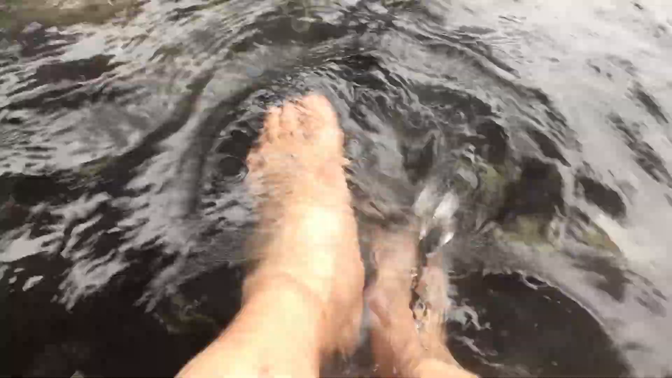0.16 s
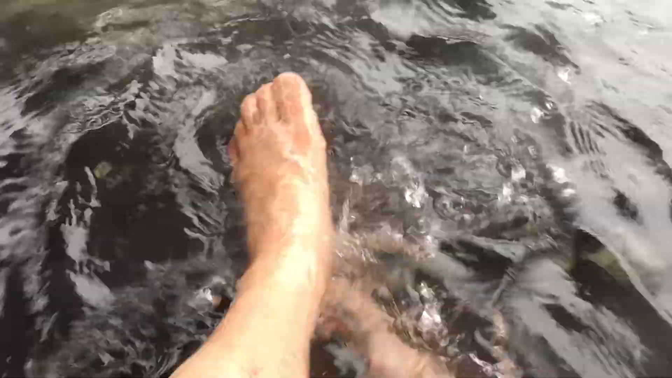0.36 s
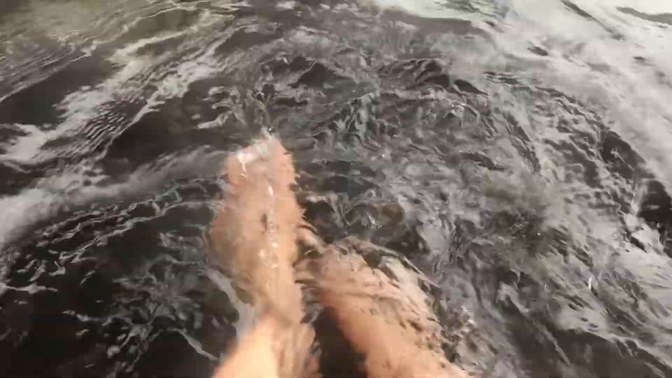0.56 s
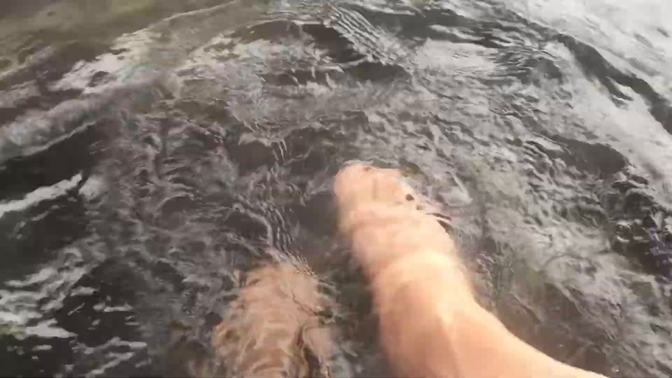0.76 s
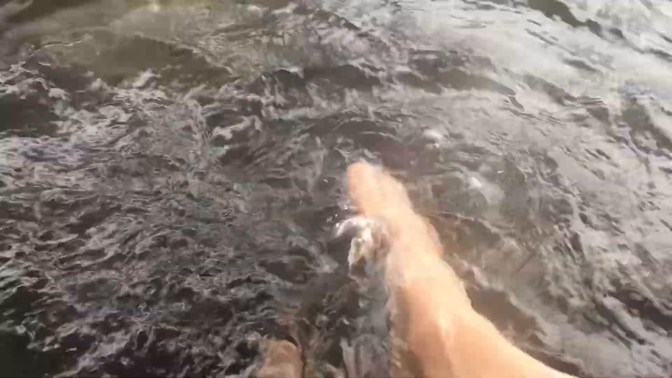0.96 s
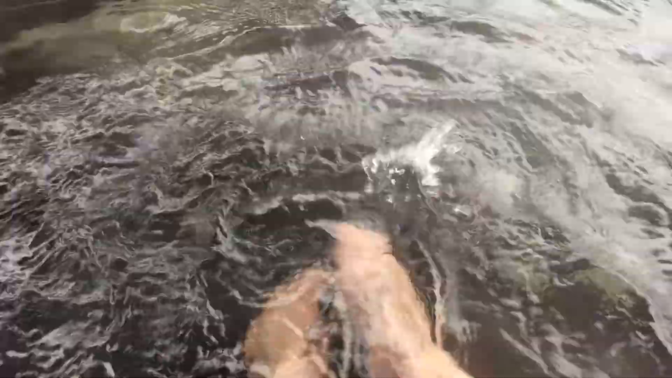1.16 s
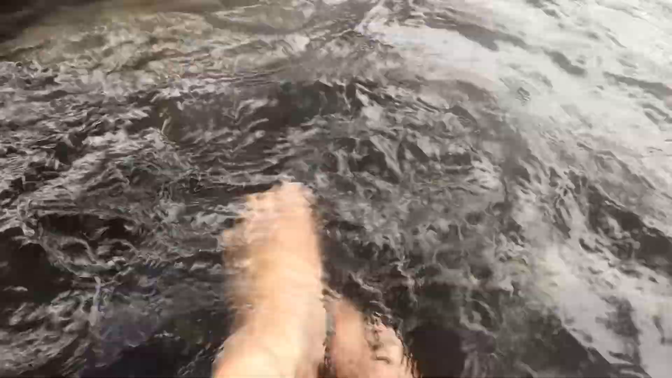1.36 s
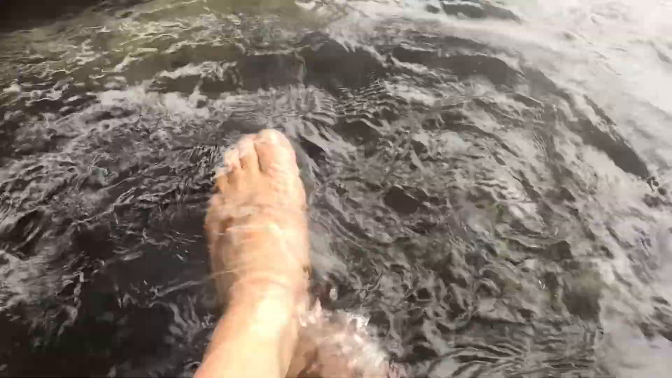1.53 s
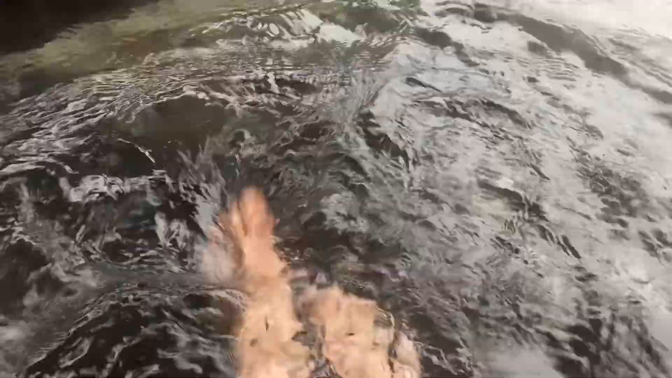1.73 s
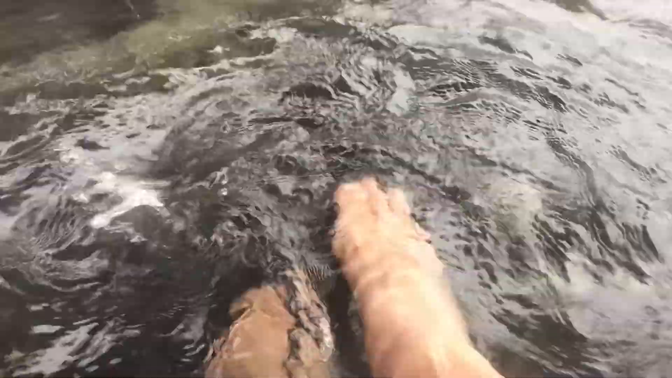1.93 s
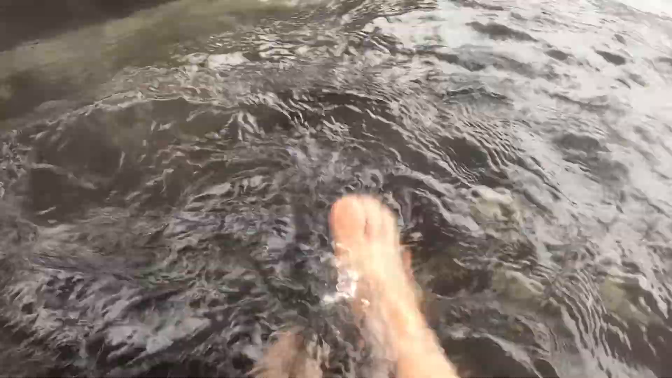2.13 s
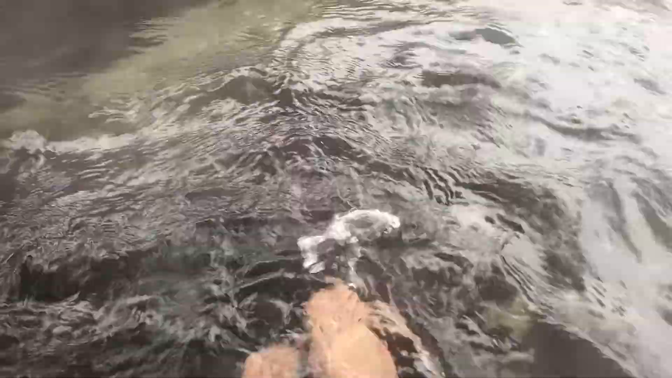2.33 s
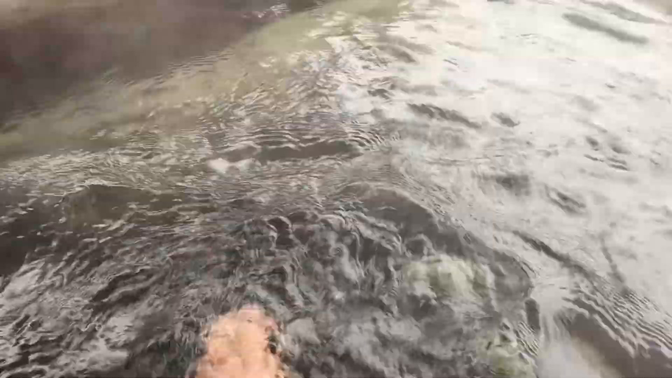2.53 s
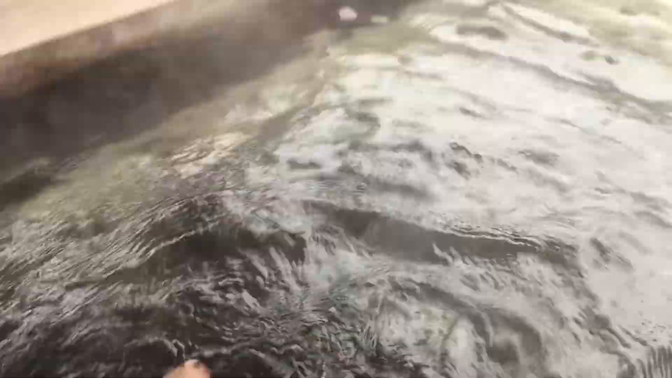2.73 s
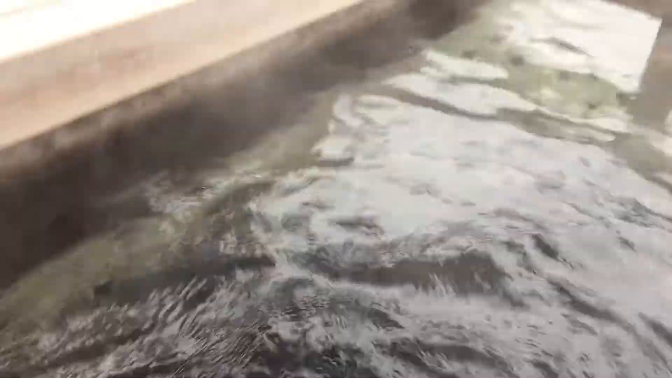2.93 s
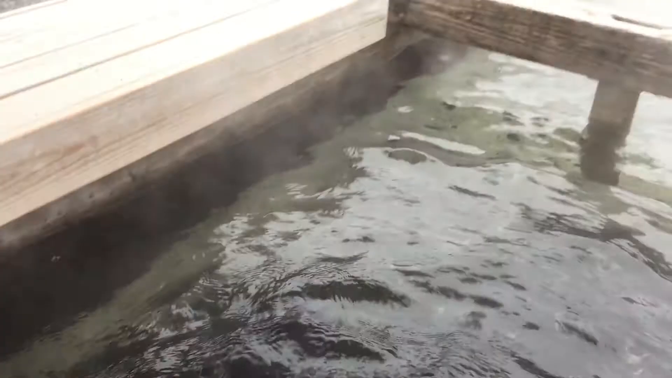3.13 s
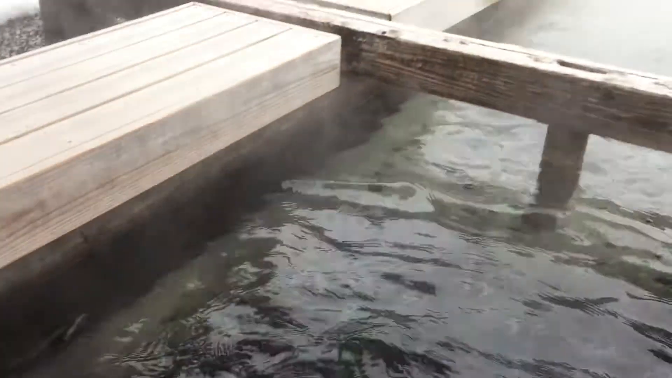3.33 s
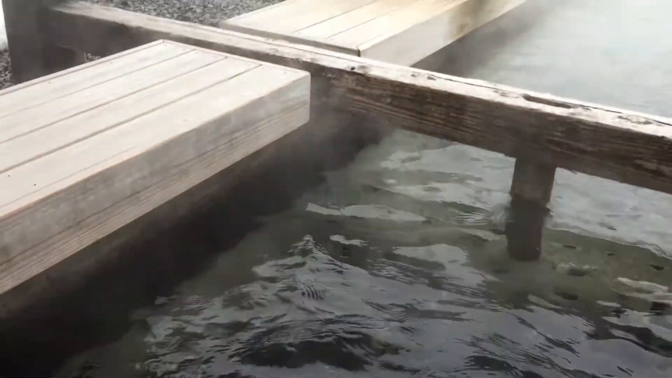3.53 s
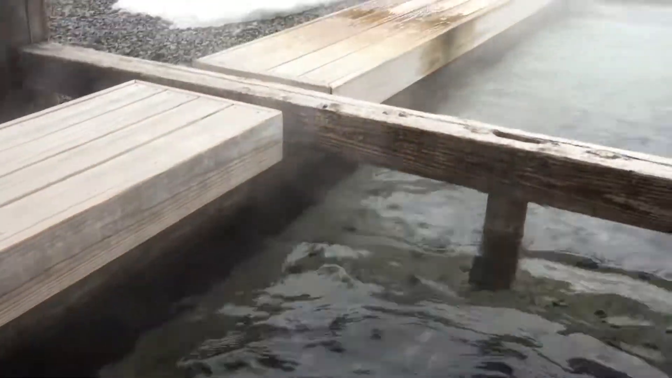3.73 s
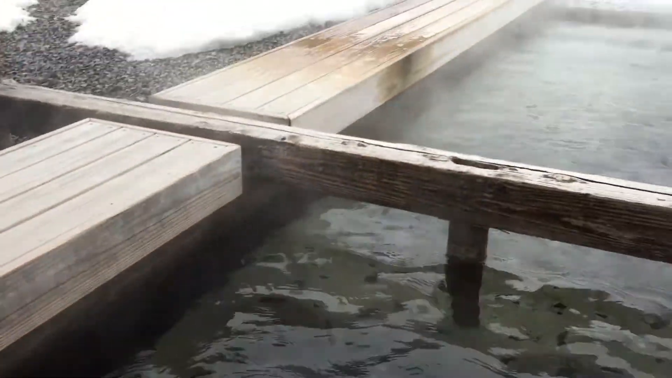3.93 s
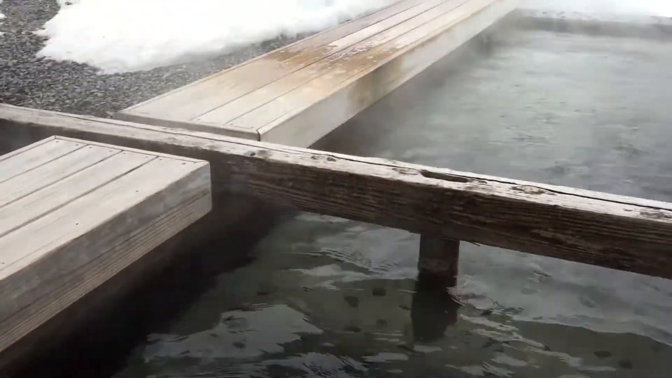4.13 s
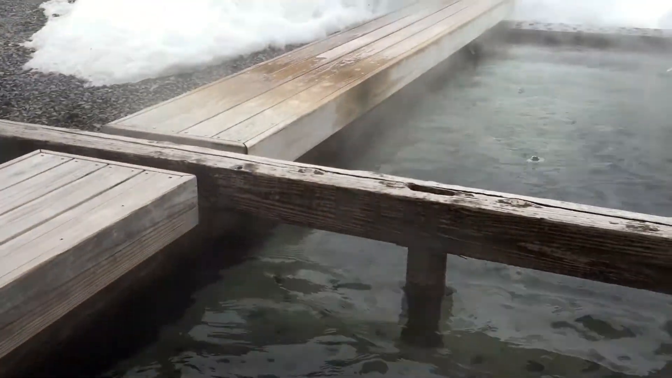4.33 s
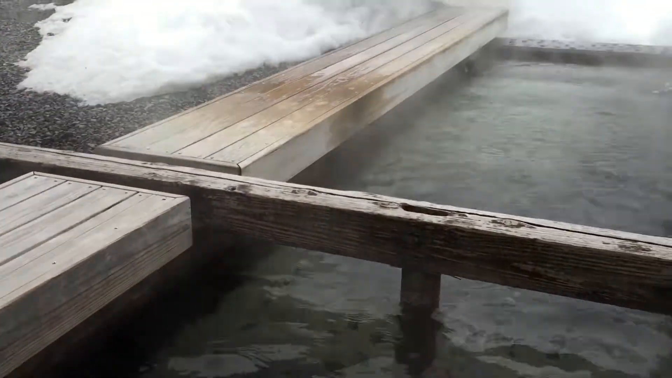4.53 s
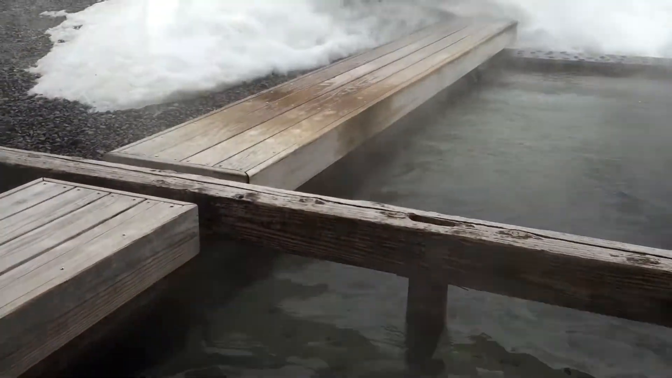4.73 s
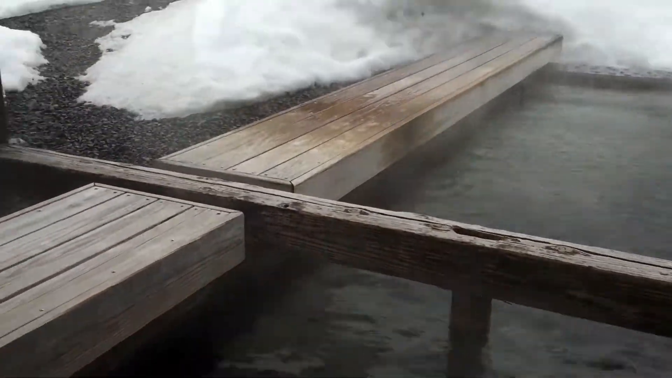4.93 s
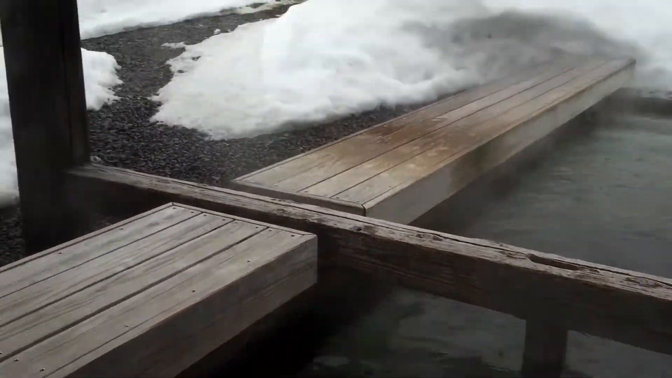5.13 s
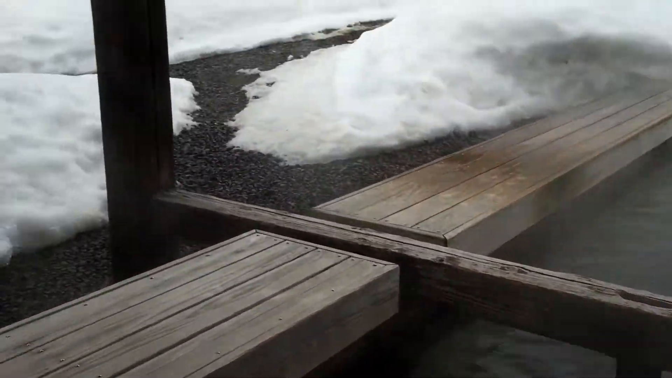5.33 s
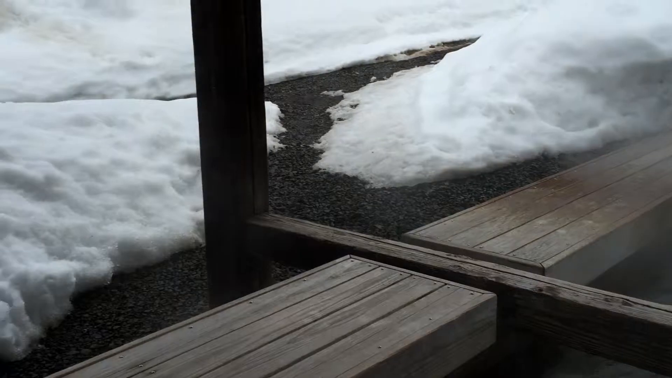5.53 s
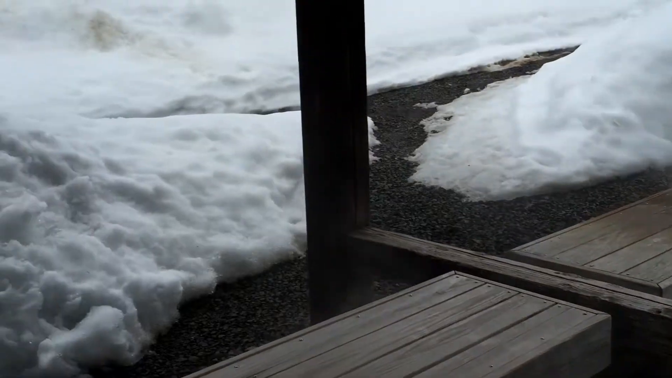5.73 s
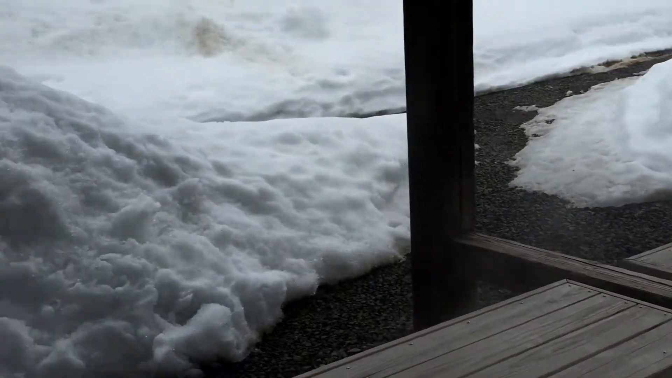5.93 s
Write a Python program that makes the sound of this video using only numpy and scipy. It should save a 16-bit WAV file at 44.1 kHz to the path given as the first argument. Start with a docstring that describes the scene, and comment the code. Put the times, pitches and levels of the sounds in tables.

```python
"""Feet in an outdoor hot footbath

Feet paddle close to the microphone, then rest while the water laps at the timber sides.
Kicks slap the surface as noise bursts, trap air that rings as gliding, decaying tones, and throw a
spray of very short, high grains. Echoes come from the roof and benches. Light wind, shaped noise,
brushes the microphone, and near the end a small clack excites resonances with rough contact noise."""
import sys
import numpy as np
from scipy import signal
from scipy.fft import rfft, irfft, next_fast_len
from scipy.io import wavfile
from scipy.ndimage import uniform_filter1d

SR = 44100
rng = np.random.default_rng(int(sys.argv[2]) if len(sys.argv) > 2 else 0)


def digitize_waveform(pressure):
    """Quantize a signal to 16-bit integers and store it at the path in sys.argv[1].

    Rows of a 2-D input are taken as channels; values are limited to [-1, 1].
    """
    field = np.atleast_2d(pressure).T
    bounded = np.clip(field, -1, 1)
    quanta = np.round(bounded * 32767).astype(np.int16)
    wavfile.write(sys.argv[1], SR, quanta)


N = 268108
TIME = np.arange(N) / SR


def amp(db):
    """Decibels to amplitude gain."""
    return 10 ** (np.asarray(db) / 20)


def unit(x):
    """Normalisation to an rms of one."""
    return x / np.sqrt(np.mean(x ** 2) + 1e-20)


def read(points, hz):
    """Interpolation of a (Hz, value) table on a log-frequency axis."""
    f, value = np.transpose(points)
    return np.interp(np.log(hz + 1), np.log(f + 1), value)


def follow(points):
    """Linear interpolation of a (seconds, value) table at every sample."""
    s, value = np.transpose(points)
    return np.interp(TIME, s, value)


def add(mix, s, sound):
    """Superposition: mixes a sound in at time s."""
    part = mix[max(round(s * SR), 0):][:len(sound)]
    part += sound[:len(part)]


def colour(x, points, tilt=0, size=1024):
    """Minimum-phase filtering: a spectrum and treble tilt (dB per octave) that keep attacks sharp."""
    hz = abs(np.fft.fftfreq(size, 1 / SR))
    octaves = np.log2(np.maximum(hz, 1500) / 5000)
    log_gain = np.log(amp(np.maximum(read(points, hz) + tilt * octaves, -80)))
    # the phase of a minimum-phase filter is the Hilbert transform of its log gain
    taps = np.fft.ifft(np.exp(np.conj(signal.hilbert(log_gain)))).real
    return signal.oaconvolve(x, taps)[:len(x)]


def noise(points):
    """Spectral shaping: steady random noise with the given spectrum, at an rms of one."""
    size = next_fast_len(N)
    gain = amp(read(points, np.fft.rfftfreq(size, 1 / SR)))
    return unit(irfft(rfft(rng.standard_normal(size)) * gain, size)[:N])


def die(age, t60):
    """Exponential decay: falls by 60 dB in t60 seconds."""
    return np.exp(-np.log(1000) * np.maximum(age, 0) / max(t60, .002))


def ring(hz, t60, rise=0, sag=0, onset=0.079):
    """Damped resonance: a decaying tone with steady pitch drift (rise) and an early fall (sag)."""
    t = np.arange(int(np.clip(t60, .002, 1) * SR * 1.2)) / SR
    age = t / t60
    glide = 1 + rise * (age - 1 / 10) + sag * (np.exp(-age * 2 * np.pi) - 1 / 2)
    turns = hz * np.cumsum(glide) / SR
    attack = 1 - np.exp(-turns / onset)  # onset in cycles
    return np.sin(2 * np.pi * turns) * np.exp(-np.log(1000) * age) * attack


def swarm(low_hz, high_hz, per_s, cycles, spread_db, glide, count=36):
    """Random pulse trains: bubbles of chance strength and time on many pitches, levelled overall."""
    out = np.zeros(N)
    for hz in np.geomspace(low_hz, high_hz, count):
        born = rng.random(N) < per_s / count / SR
        strength_db = spread_db * np.minimum(rng.exponential(1, born.sum()), 4)
        train = np.zeros(N)
        train[born] = amp(strength_db) * (-1) ** np.flatnonzero(born)  # random sign
        life, rise, sag = rng.random(3)
        bubble = ring(hz, cycles * (life + .5) / hz, rise=glide * (rise - .5), sag=glide * sag)
        out += signal.oaconvolve(train, bubble * np.sqrt(hz))[:N]
    out = unit(out)
    return out / np.sqrt(abs(uniform_filter1d(out ** 2, size=3000)) + 0.211)


# Strokes of the feet through the water. Each row: crest in seconds, churning level in dB,
# spray level in dB, 60 dB swell time in seconds, 60 dB settling time in seconds.
STROKES = [(0.0, -40.5, -44.5, .1, 0.16), (0.17, -52, -54, 0.037, 0.58), (0.238, -37.5, -42.5, 0.046, 0.25),
           (0.41, -42, -44, 0.53, 0.68), (0.6, -54.5, -47.5, 0.41, 0.3), (0.72, -59.5, -56, 0.45, 0.27),
           (0.83, -60.5, -51, 0.4, 0.38), (0.93, -47, -49.5, 0.14, 0.2), (1.03, -50.5, -54, 0.075, 0.21),
           (1.152, -50, -50.5, 0.32, .35), (1.57, -51, -56.5, .4, 0.34), (1.701, -42, -52, 0.32, .22),
           (1.861, -41, -44.5, 0.065, 0.2), (1.979, -53.5, -65, 0.45, 0.061),
           (2.098, -43.5, -51, 0.096, 0.63), (2.35, -45.5, -47, 0.14, 0.24),
           (2.465, -56.5, -63.5, 0.14, 0.07)]
# Ripples that go on between strokes and die down at rest. Each row: time in seconds, level in dB.
RIPPLE = [(0, -68), (1.35, -71.5), (2.2, -67), (2.6, -66.5), (3.2, -68), (3.9, -69), (4.7, -71), (5.3, -74)]
FIZZ_DB, FIZZ_T60_S = -17, 2.6  # foam left by a stroke keeps bursting, relative to its spray


def stirring():
    """Power addition of strokes and ripples: each stroke swells, settles and leaves fizzing foam."""
    ripple_db = follow(RIPPLE)
    churn_power = amp(ripple_db) ** 2
    spray_power = amp(ripple_db - 7.5) ** 2
    for s, churn_db, spray_db, swell, settle in STROKES:
        rise, fall = die(s - TIME, swell), die(TIME - s, settle)
        foam = amp(FIZZ_DB) * die(TIME - s, FIZZ_T60_S)
        churn_power += (amp(churn_db) * rise * fall) ** 2
        spray_power += (amp(spray_db) * rise * np.maximum(fall, foam)) ** 2
    return 10 * np.log10(churn_power), 10 * np.log10(spray_power)


# Filter on the churning bubbles. Each row: frequency in Hz, relative gain in dB.
CHURN = [(120, -47.5), (200, -3), (274, 9.5), (497, -27), (710, -0.5), (1330, 5.5), (1470, 6.5), (2280, 4),
         (2550, 2.5), (6000, -4.5), (7800, -61.5), (13200, -120)]


def churn(level_db):
    """Bubble resonance: hard stirring makes distinct bubbles, gentle stirring a blend of faint ones."""
    distinct = np.clip((level_db + 74) / 22, .3, .96)
    large = swarm(440, 4200, per_s=380, cycles=36, spread_db=3.6, glide=.2, count=48)
    faint = swarm(300, 6000, per_s=5000, cycles=30, spread_db=5.5, glide=0.084)
    teem = np.sqrt(distinct) * large + np.sqrt(1 - distinct) * faint
    return amp(level_db) * unit(colour(teem, CHURN))


# Filter on the drops and foam. Each row: frequency in Hz, relative gain in dB.
SPRAY = [(1470, -8), (2500, -27.5), (3180, 0.5), (4820, -2.5), (5930, 2.5), (10600, 3.5), (14300, 9.5),
         (15800, -13)]


def spray(level_db):
    """Resonance of tiny bubbles: fine drops and bursting foam as very short, high grains."""
    drops = swarm(2500, 15500, per_s=2000, cycles=11, spread_db=5, glide=.08)
    return amp(level_db) * unit(colour(drops, SPRAY))


# Colour of water struck at its surface, for drips and slaps.
# Each row: frequency in Hz, relative gain in dB.
SLAP_COLOUR = [(150, -33), (500, -36.5), (1200, 4.5), (3000, 12.5), (6000, 7), (10000, 4.5), (15500, -2.5)]
DRIPS_PER_S, DRIP_DB, DRIP_SPREAD_DB = 30, 9, 3  # level relative to the spray


def drips(spray_db):
    """Random impacts: stray drops land one by one, each a tiny decaying crack of noise."""
    size = amp(DRIP_SPREAD_DB * np.minimum(rng.exponential(1, N), 3))
    landings = (rng.random(N) < DRIPS_PER_S / SR) * size * amp(spray_db + DRIP_DB)
    force = signal.oaconvolve(landings, die(TIME[:SR // 20], 0.016))[:N]
    return force * noise(SLAP_COLOUR)


PLINKS_PER_S, PLINK_DB, PLINK_SPREAD_DB = 55, 3.5, 3  # level relative to the churning
PLINK_LOW_HZ, PLINK_HIGH_HZ, PLINK_MAX_DB = 550.4, 3006, -36.5
PLINK_CYCLES, PLINK_GLIDE = 64.3, 0.22  # cycles per 60 dB of decay; relative pitch change


def plinks(churn_db):
    """Bubble resonance at random: lesser bubbles, louder with harder stirring, glide as they ring."""
    out, count = np.zeros(N), int(PLINKS_PER_S * N / SR)
    for when, size, pitch, rise, sag in rng.random((count, 5)):
        hz = PLINK_LOW_HZ * (PLINK_HIGH_HZ / PLINK_LOW_HZ) ** pitch
        db = churn_db[int(when * N)] + PLINK_DB - PLINK_SPREAD_DB * np.log(size)
        bubble = ring(hz, PLINK_CYCLES / hz, PLINK_GLIDE * (rise - .5), PLINK_GLIDE * sag, onset=2.3)
        add(out, when * N / SR, amp(min(db, PLINK_MAX_DB)) * bubble)
    return out


# The light air between gusts. Each row: time in seconds, level in dB.
BREEZE = [(0, -62.5), (1.5, -66.5), (2.7, -71.5), (3.5, -67), (4.1, -64.5), (4.9, -73), (5.6, -56),
          (6.08, -63)]
# Gusts on the microphone. Each row: crest in seconds, level in dB, width in seconds.
GUSTS = [(0.61, -54, 0.041), (0.8, -45.5, 0.02), (0.93, -46.5, 0.058), (1.24, -48.5, 0.02),
         (1.49, -55, 0.043), (1.76, -52.5, 0.022), (2.119, -62, 0.073), (4.488, -43.5, 0.016),
         (4.691, -50, 0.028), (5.18, -42.5, 0.031), (5.26, -43, 0.024), (5.48, -49.5, 0.064),
         (5.62, -38.5, 0.086), (5.86, -47.5, 0.019)]
# Spectrum of the eddies before the bass filter. Each row: frequency in Hz, relative level in dB.
WIND = [(20, -41), (35, -14.5), (55, 0), (90, -5), (140, -11.5), (220, -13.5), (330, -32.5), (600, -72)]
GUST_SHAPE = 1.6  # 1 = pointed crest, 2 = round


def wind():
    """Turbulence at the microphone: low eddies; stronger gusts reach above the deepest bass."""
    power = amp(follow(BREEZE)) ** 2
    for s, db, width in GUSTS:
        gust = amp(db) * np.exp(-abs((TIME - s) / width) ** GUST_SHAPE)
        power += gust ** 2
    level_db = 10 * np.log10(power)
    eddies = noise(WIND)
    deep = unit(signal.sosfiltfilt(signal.butter(2, 110, fs=SR, output="sos"), eddies))
    strength = np.clip((level_db + 49.5) / 14, 0, 1)
    eddies = deep + strength * (eddies - deep)
    # partly even out the noise's own swells, so the level follows the gusts
    return amp(level_db) * eddies / np.sqrt(abs(uniform_filter1d(eddies ** 2, size=2000)) + 0.13)


# Spectrum of the outdoor hush. Each row: frequency in Hz, relative level in dB.
AIR = [(18, -60.5), (30, -48.5), (79, 0), (193, 2.5), (424, -9), (523, -7.5), (628, -9.5), (1610, -15),
       (4980, -23.5), (9110, -24.5), (10400, -25.5), (13200, -27), (14600, -23.5), (15800, -32.5)]
AIR_DB = -65  # rms level


def hush():
    """Stationary noise: the steady outdoor background."""
    return amp(AIR_DB) * noise(AIR)


# Echo of the roof and benches. Each row: frequency in Hz, 60 dB decay time in seconds.
SHELTER = [(200, 0.28), (1000, 0.07), (4000, 0.1), (15000, 0.085)]
# Reflected share of the water's sound. Each row: time in seconds, share in dB of amplitude.
REFLECTED = [(0, -10.5), (2.4, -11.5), (3.3, -6), (5.4, -7)]


def shelter(water):
    """Reverberation: sparse, faint reflections, each band dying at its own speed, join the direct sound."""
    taps = rng.standard_normal(SR // 2) * (rng.random(SR // 2) < 2000 / SR)
    taps[:SR // 400] = 0  # no reflection before 2.5 ms
    hz, t, bands = signal.stft(taps, SR, nperseg=256)
    decay = np.exp(-np.log(1000) * t / read(SHELTER, hz)[:, None])
    tail = signal.istft(bands * decay, SR, nperseg=256)[1]
    share = np.clip(amp(follow(REFLECTED)), 0, .9)
    echo = signal.oaconvolve(share * water, tail / np.linalg.norm(tail))[:N]
    return np.sqrt(1 - share ** 2) * water + echo


# The loudest single bubbles. Each row: start in seconds, level in dB, nominal pitch in Hz.
BUBBLES = [(0.004, -36.5, 812), (0.0416, -30.5, 2150), (0.15, -31, 1010), (0.1631, -29.5, 1920),
           (0.208, -25.5, 1340), (0.2362, -17, 1005), (0.2489, -15, 3380), (0.297, -17, 1870),
           (0.3232, -29, 1080), (0.3575, -29, 936), (0.3694, -30, 5240), (0.3916, -18.5, 2220),
           (0.3925, -14.5, 4930), (0.407, -25, 1460), (0.4128, -30, 714), (0.5, -33, 1740),
           (0.519, -30, 1150), (0.549, -32, 1920), (0.599, -29, 1300), (0.6169, -24, 978),
           (0.717, -35, 2150), (0.7184, -42.5, 509), (0.8222, -34, 838), (0.8967, -27.5, 3160),
           (0.9354, -22, 6100), (0.9367, -31, 2000), (1.029, -41.5, 1086), (1.102, -29.5, 1680),
           (1.1445, -10.5, 3890), (1.147, -25, 1585), (1.3584, -34, 3450), (1.455, -36, 1590),
           (1.493, -29, 1716), (1.562, -35, 1286), (1.6224, -27.5, 2210), (1.6773, -26.5, 3380),
           (1.6978, -11, 1640), (1.8521, -23.5, 908), (1.8596, -5.5, 3350), (1.8605, -12, 815),
           (1.8613, -11, 5740), (1.96, -43, 710), (1.9625, -39, 1930), (2.0276, -32.5, 1960),
           (2.0855, -20, 2590), (2.098, -27, 1680), (2.1187, -20, 2690), (2.1307, -34, 1045),
           (2.135, -24.5, 3260), (2.1855, -39.5, 843), (2.22, -39, 730), (2.2891, -38.5, 1036),
           (2.325, -26, 1900), (2.3318, -35, 1110), (2.3362, -20, 5800), (2.3684, -34, 715),
           (2.4417, -36.5, 1395), (2.479, -33.5, 3340), (2.713, -30, 2290), (2.7726, -30.5, 1810),
           (2.8942, -35.5, 1950), (2.9328, -25, 1916), (2.9608, -43, 880), (3.0376, -43, 1053),
           (3.3283, -35.5, 1430), (3.3727, -38, 3830), (3.446, -43.5, 1030), (3.505, -34, 865),
           (3.665, -47.5, 960), (3.757, -39.5, 1550), (3.8847, -37, 3800), (4.415, -39, 780),
           (4.445, -44, 2400), (4.612, -44.5, 794), (4.7278, -38, 677), (4.9792, -38, 1310),
           (5.0357, -33.5, 2020), (5.0403, -43.5, 863)]
# a bubble at the reference level decays 60 dB in this many cycles; half as many per 33 dB louder
RING_CYCLES, RING_AT_DB, RING_HALVES_DB = 37.9, -40, 33


def bubbles():
    """Bubble resonance: the larger bubbles ring at their own pitch, strong ones damped sooner."""
    out = np.zeros(N)
    for s, db, hz in BUBBLES:
        rise, sag = rng.random(2)
        t60 = RING_CYCLES / hz * 2 ** ((RING_AT_DB - db) / RING_HALVES_DB)
        add(out, s, amp(db) * ring(hz, t60, rise=.16 * (rise - .5), sag=0.2 * sag, onset=1.09))
    return out


# The loudest slaps of skin and falling water on the surface. Each row: start in seconds,
# peak level in dB before the shelter, approximate 60 dB crack decay in seconds,
# treble tilt in dB per octave.
SLAPS = [(0.0244, -30, 0.018, 2), (0.2151, -27, 0.011, 3), (0.235, -9, 0.013, 2), (0.39, -19, 0.007, 0),
         (0.4351, -24.5, 0.0085, -1), (0.613, -20, 0.015, 5.5), (0.8108, -31.5, 0.012, 10),
         (0.8849, -31, 0.01, 3.5), (0.934, -26.5, .015, -4.5), (1.1428, -25.5, 0.038, 4),
         (1.5607, -24.5, 0.0072, 0), (1.6663, -34, 0.0086, -4), (1.7538, -32.5, .009, 6.5),
         (1.842, -31, 0.012, 2), (1.8584, -18, 0.012, -3), (2.0702, -26, 0.0082, 9),
         (2.0882, -21, 0.021, 10.5), (2.1169, -24.5, 0.022, -10), (2.32, -31, .01, -1),
         (2.351, -33, 0.027, -1), (2.4633, -36, 0.019, 10.5), (2.771, -40, .009, 4.5),
         (2.881, -36, .006, 9), (3.3726, -39, 0.0084, -0.5), (3.831, -42, .025, -4.5),
         (4.2127, -42.5, 0.0085, -0.5), (4.5106, -43.5, 0.038, -1), (4.624, -40.5, .02, 18),
         (4.7481, -40, 0.026, -2.5), (5.002, -43.5, 0.0091, 5), (5.296, -51, 0.075, 8.5)]


def slaps():
    """Impact noise: a sharp crack at contact, then a patter as the crown of water falls back."""
    out, t = np.zeros(N), np.arange(SR // 8) / SR
    bands = np.linspace(300, 15500, 22)  # Hz
    drops = swarm(1500, 14000, per_s=2500, cycles=8, spread_db=3, glide=.1)
    for s, db, t60, tilt in SLAPS:
        burst, uneven = rng.standard_normal(len(t)), rng.standard_normal(len(bands))
        age = t / max(t60, .002)
        crack = np.tanh(burst) * age * np.exp(-10 * age)
        # random uneven bands give each slap's crack its own patchy colour
        crack = colour(crack, np.c_[bands, 5 * np.clip(uneven, -2, 1)])
        patter = unit(drops[int(abs(s) * SR):][:len(t)])
        crown = patter * np.exp(-t / 0.031) * (1 - np.exp(-t / 0.009))
        sound = colour(crack / abs(crack).max() + amp(-27.5) * crown, SLAP_COLOUR, tilt)
        add(out, s, amp(db) * sound / abs(sound).max())
    return out


# Wavelets that fold over behind the feet or lap at the sides. Each row: start in seconds,
# level in dB, length in seconds, central pitch in Hz.
LAPS = [(0.236, -36.5, 0.0346, 750), (0.295, -48.5, .25, 564), (0.307, -44.5, 0.13, 1250),
        (0.891, -54.5, 0.093, 1580), (1.609, -54.5, 0.11, 1050), (2.166, -60.5, 0.1, 815),
        (2.691, -57.5, 0.12, 1080), (2.943, -61.5, 0.064, 2190), (3.407, -62.5, 0.078, 2140),
        (3.427, -60, 0.13, 920), (3.492, -60.5, 0.076, 3850), (3.802, -51.5, 0.046, 1330),
        (3.88, -55, 0.027, 2310), (3.972, -55.5, 0.045, 790), (4.044, -64, .13, 1600),
        (4.133, -58.5, 0.021, 3620), (4.416, -62, 0.065, 1870), (4.496, -62, 0.22, 1170),
        (4.69, -51, 0.062, 1040), (4.789, -55.5, 0.017, 2820), (4.967, -54, 0.058, 1380),
        (5.277, -67, 0.074, 4380)]


def laps():
    """Bubble clusters: each wavelet folds over and lets go a short group around one size."""
    out = np.zeros(N)
    teem = swarm(401.7, 6990, per_s=820, cycles=66, spread_db=4, glide=0.096)
    for s, db, length, hz in LAPS:
        cluster = teem[int(s * SR):][:int(max(length, .005) * SR)]
        cluster = colour(cluster, [(hz / 4, -14), (hz / 2, -2), (hz, 0), (hz * 2, -4), (hz * 4, -14)])
        add(out, s, amp(db) * unit(cluster) * signal.windows.tukey(len(cluster), .4))
    return out


# Large air pockets closed in under a foot. Each row: start in seconds, level in dB,
# nominal pitch in Hz, 60 dB decay time in seconds.
POCKETS = [(0.237, -17, 226, 0.15), (0.305, -37, 363, 0.065), (0.402, -39.5, 277, 0.3),
           (0.93, -30.5, 287, 0.045), (2.089, -44, 290, 0.092), (2.23, -53, 135.3, .6),
           (3.352, -48, 202, 0.15)]


def gulps():
    """Low cavity resonance: big pockets of air boom under the plunging feet, without echo."""
    out = np.zeros(N)
    for s, db, hz, t60 in POCKETS:
        add(out, s, amp(db) * ring(hz, t60, rise=.05, onset=.3))
    return out


# The clack and its rattle. Each row: start in seconds, force level in dB.
CLACK = [(5.9, -40), (5.904, -56), (5.917, -54), (5.92, -54), (5.933, -60), (5.956, -59.5)]
# Spectrum of its dry contact noise. Each row: frequency in Hz, relative level in dB.
CLACK_SCUFF = [(1000, -16), (2000, 14), (7000, -6), (8200, 1), (15000, 3)]
# What it rings with. Each row: frequency in Hz, relative level in dB, 60 dB decay time in seconds.
CLACK_MODES = [(233, -8, 0.075), (1585, -4, 0.12), (2120, -7, 0.1), (2570, -15, 0.026), (3100, -20, 0.1),
               (3540, -16.5, 0.08), (4307, -19, 0.1), (5220, -11.5, 0.0048), (6050, -10.5, 0.06),
               (6530, -8, 0.0032)]


def clack():
    """Modal excitation: a small hard object knocks and scuffs; rough contact feeds its resonances."""
    force, t = np.zeros(N), np.arange(SR // 8) / SR
    for s, db in CLACK:
        add(force, s, amp(db) * np.exp(-t / 0.014))
    out = amp(-10.5) * force * noise(CLACK_SCUFF)
    for hz, mode_db, t60 in CLACK_MODES:
        mode = ring(hz, t60)
        contact = force * rng.standard_normal(N)
        out += amp(mode_db - 3.5) * signal.oaconvolve(contact, mode / np.linalg.norm(mode))[:N]
    return out


def scene():
    """Superposition: water under the shelter, with dry gulps, the clack, wind and outdoor hush."""
    churn_db, spray_db = stirring()
    water = churn(churn_db) + spray(spray_db) + drips(spray_db) + plinks(churn_db)
    water += bubbles() + slaps() + laps()
    return (shelter(water) + gulps() + clack() + wind() + hush())[None]


def record(dry):
    """Band limiting: a steep low-pass at 15.9 kHz."""
    taps = signal.firwin(401, 15900, window=("kaiser", 8), fs=SR)
    return signal.oaconvolve(dry, taps[None], "same")


dry = scene()
out = record(dry)
digitize_waveform(out)
```